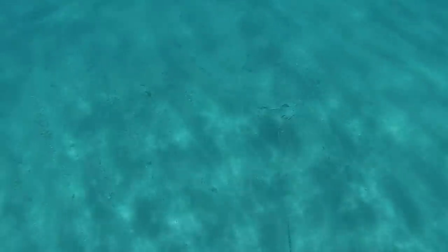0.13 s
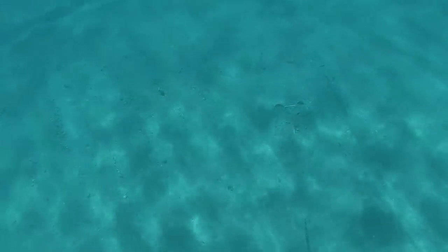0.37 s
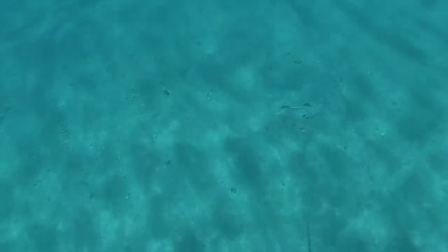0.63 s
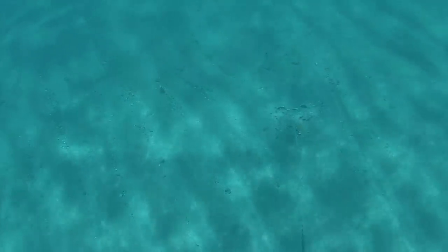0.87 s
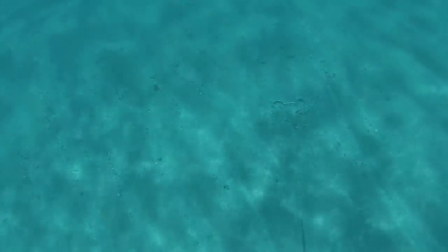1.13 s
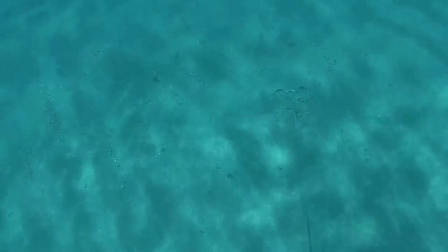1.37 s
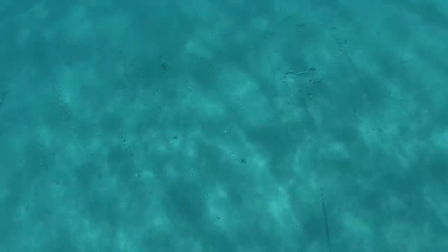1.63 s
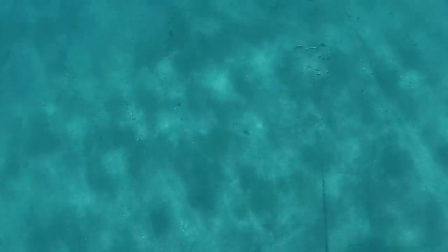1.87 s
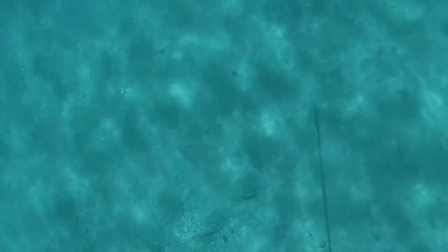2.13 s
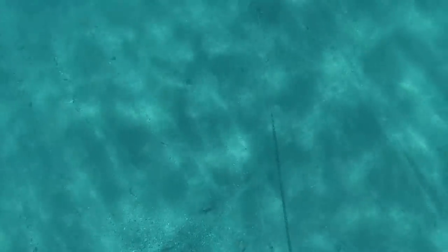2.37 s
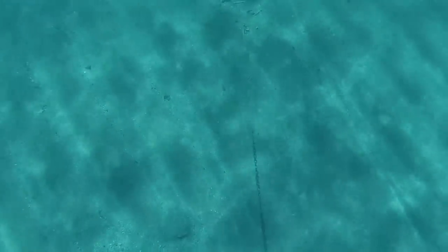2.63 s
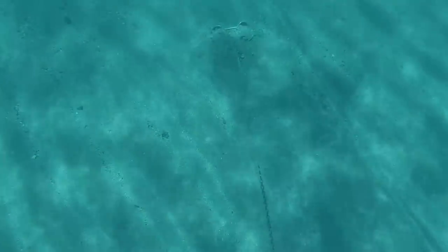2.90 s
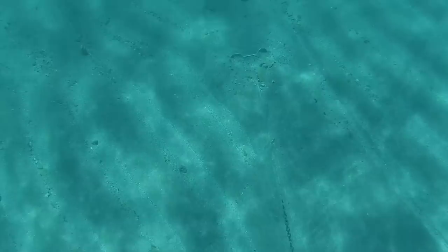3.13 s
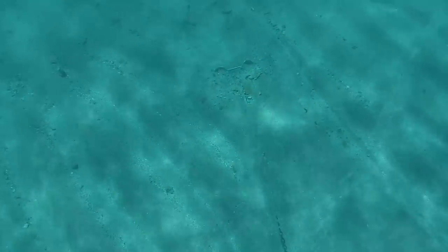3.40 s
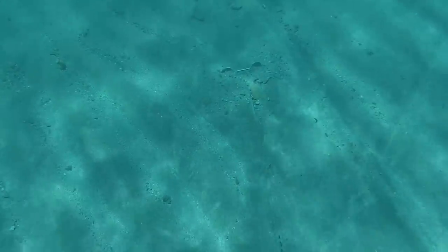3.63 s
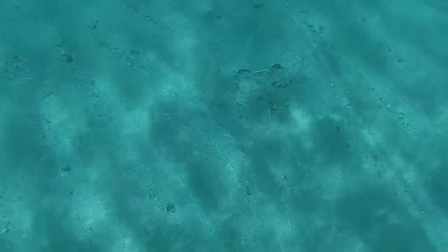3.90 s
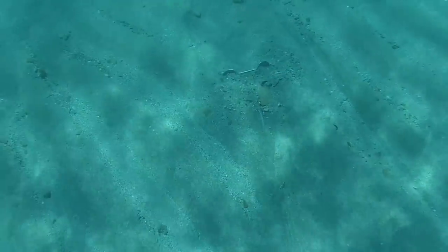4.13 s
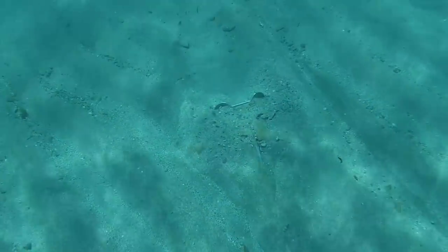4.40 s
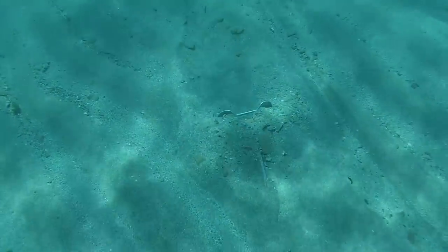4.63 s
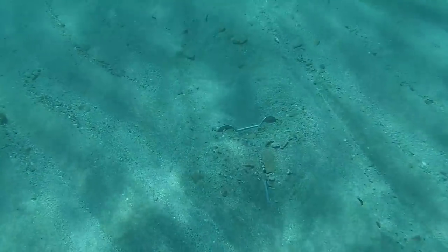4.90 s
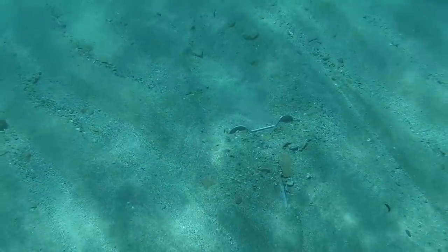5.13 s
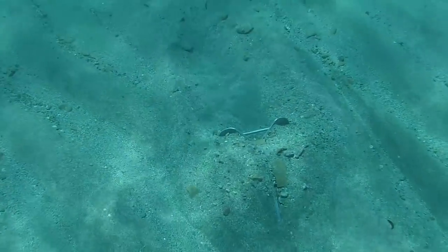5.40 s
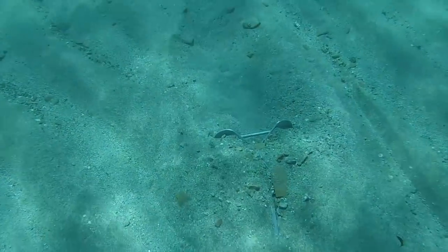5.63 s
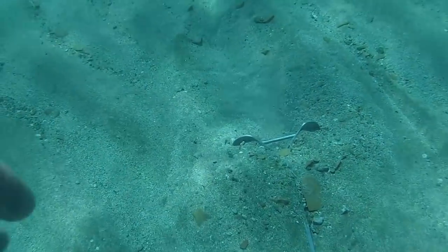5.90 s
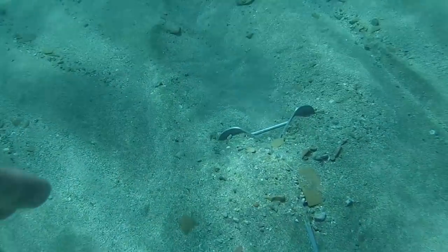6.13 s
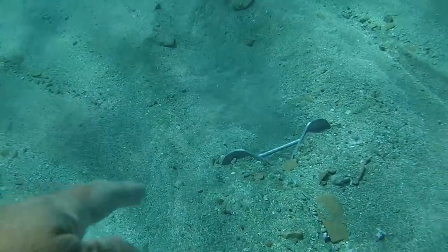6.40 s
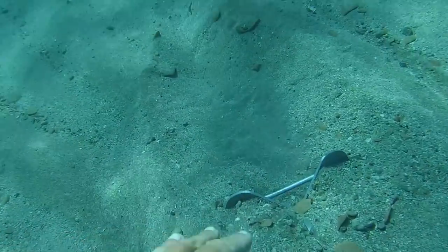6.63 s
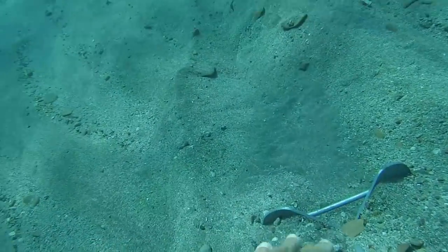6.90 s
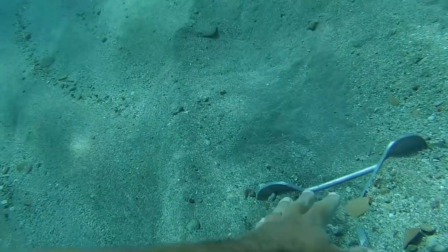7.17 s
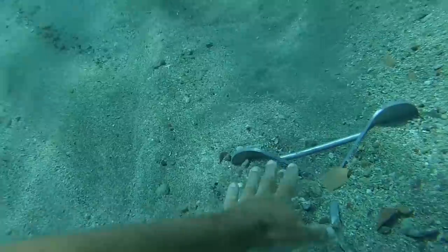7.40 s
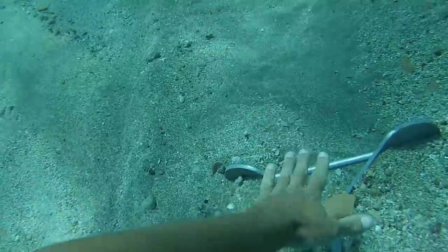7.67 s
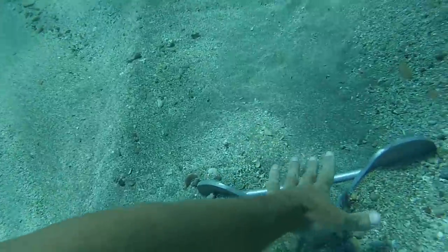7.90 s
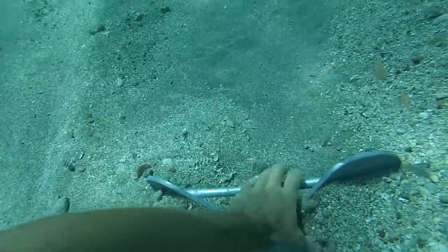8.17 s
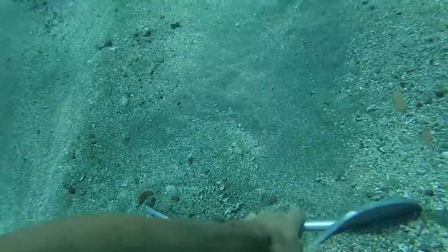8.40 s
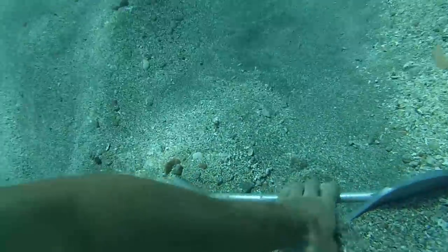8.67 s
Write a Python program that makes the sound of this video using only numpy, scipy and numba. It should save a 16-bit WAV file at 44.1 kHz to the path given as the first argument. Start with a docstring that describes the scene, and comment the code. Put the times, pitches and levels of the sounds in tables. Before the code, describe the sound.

A far boat engine throbs throughout, about 35 soft pulses a second, heard as a hollow, rough hum ringing in a sealed underwater case. Faint hiss and flurries of tiny seabed crackles lie behind. A knock with a brief watery gurgle opens, then faint ticks until a bubble at 1.3 s and a dull bump at 1.75 s. From 1.9 s bubbles gather into a splashy gurgle, capped by a heavy hollow knock at 2.4 s; the hum then strengthens. Scattered bubbles and a light tick follow. At 4.0-4.2 s a buckle gives a quick bright, gritty series of snaps, slightly louder right, amid bubbles and a pop. Low air pops come near 4.7 s, knocks and a bump around 5.2-5.3 s, and bigger bursts at 5.5 s. Afterwards it calms: hum, isolated bubbles, clearest at 7.5 s, and small taps at 6.7, 7.2 and 7.55 s until the end at 8.8 s.

```python
"""Sinking camera case

A camera in a sealed case sinks toward the seabed while a far six-cylinder boat engine throbs through the water.
Firing pulses and steady noise drive the case's resonances, which glide with depth. Behind them lie shaped hiss
with seabed crackle, rumbling eddies and gurgling air made of many ringing bubbles. Damped tones and short
pulses make the single bubbles, bursting pockets, bumps and knocks; noise cracks and a rub make a strap buckle.
"""
import sys
import numpy as np
from scipy import signal
from scipy.fft import rfft, irfft
from scipy.io import wavfile
from scipy.ndimage import uniform_filter1d
from numba import njit

SR = 44100
rng = np.random.default_rng(int(sys.argv[2]) if len(sys.argv) > 2 else 0)


def pcm_store(signal):
    """Save signal as 16-bit PCM."""
    levels = np.round(np.clip(np.atleast_2d(signal), -1, 1) * 32767)
    wavfile.write(sys.argv[1], SR, levels.astype(np.int16).T)


def voltage_ratio(level):
    """Linear amplitude factor for a level in decibels (scalar or array-like)."""
    return 10 ** (np.asarray(level, float) / 20)


N = 387328
T = np.arange(N) / SR
FIRING_HZ = 34.95

# Hiss colour, relative: f/Hz, level/dB per Hz
HISS_COLOUR = [(35, -48), (60, -17), (326, -17), (569, 2), (701, -2.5), (969, -28), (1610, -11),
               (1900, -27.5), (3240, -28), (5150, -32), (13900, -38.5), (15300, -44)]
# Water moving past: t/s, rumble level/dB, gurgle drive level/dB
WATER_FLOW = [(0.0, -47, -77), (0.07, -35, -35.5), (0.12, -45.5, -63.5), (0.98, -51.5, -62.5),
              (2.12, -45, -48), (2.4, -35, -32), (2.49, -33, -39.5), (3.4, -44.5, -52.5), (4.25, -34, -35),
              (4.33, -38, -48.5), (4.74, -44, -38.5), (4.96, -44.5, -51), (5.13, -40, -35.5),
              (5.45, -41, -51), (5.52, -41, -31.5), (5.75, -42.5, -50.5), (8.73, -44.5, -58),
              (8.78, -37, -49)]
# Single bubbles: t/s, peak level of the body before its swell and ring overlap others/dB, starting f/Hz
SINGLE_BUBBLES = [(1.275, -36, 376), (1.93, -36.5, 165.), (2.04, -28, 772), (2.083, -30, 739),
                  (2.133, -23.5, 598), (2.2, -26.5, 492), (2.284, -21, 610), (2.301, -18, 562),
                  (2.316, -18.5, 538), (2.732, -28, 590.), (2.777, -26., 593.4), (3.24, -28, 370.),
                  (3.682, -26.5, 480.), (3.73, -28., 319.2), (4.047, -19, 505), (4.194, -20.5, 529),
                  (4.227, -20.5, 567), (4.369, -24.5, 637), (5.148, -25.5, 277.6), (5.97, -28, 643.),
                  (6.978, -28.5, 698.6), (7.465, -29, 666), (7.536, -20, 684), (7.615, -31, 550),
                  (8.003, -25, 816.6), (8.463, -28, 614)]
# Air pockets that burst at the port: t/s, drive level/dB, starting f/Hz
AIR_POPS = [(4.2395, -14.5, 560.), (4.637, -27, 333.4), (4.681, -21.5, 298), (4.718, -19, 324),
            (5.517, -19., 370.), (5.5539, -20, 279), (5.5649, -13.5, 260.)]
# Dull bumps: t/s, level/dB, length/s
DULL_BUMPS = [(1.75, -29, 0.019), (2.402, -16, 0.011), (5.3145, -19, 0.0073)]
# Knocks on the case: t/s, drive level/dB, starting f/Hz, tick drive level/dB, tick f/Hz
CASE_KNOCKS = [(.0553, -13.5, 623, -34, 2690), (.573, -47, 603., -40, 3300), (.706, -40, 670, -43, 3060),
               (2.3745, -26, 962, -31.5, 2190), (2.3775, -0.5, 648, -25.5, 1584),
               (2.444, -19, 1110, -27, 2440), (3.005, -25.5, 1650, -35.5, 3040),
               (5.182, -25, 655., -33.5, 1625), (5.3035, -18, 728, -31.5, 1580),
               (6.675, -45, 650., -33.5, 3260), (7.17, -25, 775, -36, 1730.), (7.55, -41, 686, -35, 2200)]
# Buckle snaps: t/s, drive level/dB, starting f/Hz, dull part drive level/dB
BUCKLE_SNAPS = [(3.991, -26, 5230, -34), (4.0047, -11, 5230, -25), (4.0543, -7, 8860, -26.5),
                (4.0732, -8.5, 13000, -28), (4.1013, -24.5, 6530, -32), (4.127, -12, 15200, -29),
                (4.1374, -32, 9430, -41), (4.1735, -34, 4680, -32), (4.1852, -10.5, 14560, -27.5),
                (4.194, -36, 9100, -32)]
# Firings arrive early or late as the engine hunts and the diver moves: t/s, lag/ms (below 0 is early)
FIRING_LAG = [(0.0, -0.2), (1.05, -1.9), (1.75, -1.6), (2.45, -10.0), (3.5, -1.2), (4.2, -14.3),
              (4.9, -5.0), (5.6, -11.5), (6.3, -11.0), (6.65, -12.7), (7.0, -9.7), (7.7, -14.0),
              (8.05, -11.3), (8.78, -12.7)]
# Strength of the six cylinders in firing order, relative: level/dB
CYLINDER_LEVEL = [1.5, 3, -3, 0.5, 1, 1.8]
# Case resonances: f at the surface/Hz, f at the bottom/Hz, width/Hz, share of steady water noise/0-1
CASE_RESONANCES = [(590., 643, 76, 0.77), (1263, 1085, 53, 0.4), (1501, 1701, 95, 0.34),
                   (2294, 2226, 300, 0.48), (3030, 3300, 206, 0.75)]
# Sinking: t/s, depth/0 surface to 1 bottom
CASE_DEPTH = [(0, 0.063), (2.2, 0.17), (6.8, .9), (8.78, 0.84)]
# Hum in each case resonance, changing with the surface echo: t/s, five drive levels/dB
HUM_LEVELS = [(0.0, -48.5, -60., -64, -65.5, -63.5), (1.979, -46.5, -60.5, -62, -62.5, -61),
              (2.4, -38, -52.5, -53.5, -56.5, -55.5), (2.95, -36.5, -54.5, -49, -52.5, -63),
              (3.5, -41., -66, -48, -62.5, -63), (4.4, -40.5, -58, -55, -56.5, -64.5),
              (5.9, -45, -73.5, -47.5, -55.5, -64), (7.55, -42.5, -60.5, -57.5, -55., -65.5),
              (8.78, -43.5, -61, -60.5, -57.5, -69)]


def unit(x):
    """Scale to rms 1."""
    return x / np.sqrt(np.mean(x ** 2))


def curves(table):
    """Draw each column of a table as a curve, one value a sample."""
    s, *columns = np.transpose(table)
    return [np.interp(T, s, column) for column in columns]


@njit
def svf(x, hz, width):
    """State-variable band-pass with a moving centre, gain 1 there."""
    y, b, l = np.empty(len(x)), 0., 0.
    for i in range(len(x)):
        g, k = np.tan(np.pi * hz[i] / SR), width / hz[i]
        v = (b + g * (x[i] - l)) / (1 + g * (g + k))
        b, l, y[i] = 2 * v - b, l + 2 * g * v, k * v
    return y


def band(x, lo_hz, hi_hz):
    """Fixed band-pass."""
    return signal.sosfilt(signal.butter(2, [lo_hz, hi_hz], "band", fs=SR, output="sos"), x)


def walk(rate):
    """Random levels held 1 / rate s and slewed twice; spread near 1."""
    k = int(SR / rate)
    steps = np.repeat(rng.standard_normal(N // k + 1), k)
    return 1.57 * uniform_filter1d(uniform_filter1d(steps, k), k)[:N]


def add(out, s, sound):
    """Mix a sound in at s seconds."""
    i = int(max(s, 0) * SR)
    n = min(sound.shape[-1], N - i)
    out[..., i:i + n] += sound[..., :n]


def ring(hz, t60, rise, glide):
    """A damped tone, envelope peak 1, with rise time constant in s; pitch climbs by the part glide over t60 s."""
    t = np.arange(int(t60 * SR) + 9) / SR
    shape = (1 - np.exp(-t / rise)) * np.exp(-np.log(1000) * t / t60)
    return shape / shape.max() * np.sin(2 * np.pi * hz * (t + glide * t ** 2 / (2 * t60)))


def water():
    """Faint hiss with the dense crackle of small seabed animals, which comes in flurries."""
    chance = 70. * voltage_ratio(4. * walk(12)) / SR  # 70 clicks a second, swelling and thinning
    clicks = (rng.random(N) < chance) * voltage_ratio(np.minimum(2.4 * rng.exponential(size=N), 9.))
    # each click becomes a decaying puff of noise
    crackle = signal.lfilter([1], [1, -.991], clicks) * rng.standard_normal(N)
    drive = rng.standard_normal(N) * voltage_ratio(1.1 * walk(16))
    drive += 0.74 * unit(band(crackle, 1230.0, 10600.0))
    hz = np.maximum(np.fft.rfftfreq(N, 1 / SR), 1)
    f, db = np.transpose(HISS_COLOUR)
    colour = voltage_ratio(np.interp(np.log(hz), np.log(f), db))
    hiss = unit(irfft(rfft(drive) * colour, N))
    return voltage_ratio(-47) * hiss + voltage_ratio(-64.0) * unit(band(crackle, 2830.0, 4140.0))


def flow():
    """Eddies press on the membrane; a stream of bubbles leaves the case, churning and fizzing."""
    rumble_db, gurgle_db = curves(WATER_FLOW)
    eddies = signal.lfilter([1], [1, -.996], rng.standard_normal(N))
    flutter = band(eddies, 38.7, 153.0) * voltage_ratio(4.44 * walk(7.6))
    rumble = unit(band(eddies, 7.4, 52.5) + .5 * flutter)

    bubbles = np.zeros(N)
    for when, size, loud, last in rng.random((1000, 4)):
        hz = 168.3 * (777.0 / 173.0) ** size
        cycles = 3.05 + 15.4 * last
        add(bubbles, when * N / SR, voltage_ratio(-2.5 * np.log(loud + 0.01)) * ring(hz, cycles / hz, 0.0008, 0.45))
    churn = band(rng.standard_normal(N), 230.0, 860.0) * voltage_ratio(3.4 * walk(20))
    # the fizz follows the bubbles' loudness
    fizz = band(rng.standard_normal(N), 1100., 3940.0) * uniform_filter1d(np.abs(bubbles), 300)
    low_pass = signal.butter(4, 900., fs=SR, output="sos")
    stream = signal.sosfilt(low_pass, 0.96 * unit(bubbles) + 0.71 * unit(churn))
    return voltage_ratio(rumble_db) * rumble + voltage_ratio(gurgle_db) * (stream + 0.11 * unit(fizz))


def single_bubbles():
    """Each bubble rings with a climbing pitch; its neck snaps shut and stirs the case."""
    out = np.zeros(N)
    for s, db, hz in SINGLE_BUBBLES:
        add(out, s, voltage_ratio(db) * ring(hz, 0.063, 0.003, 0.11))
        add(out, s, voltage_ratio(db) * 0.5 * ring(554.0, 0.012, 0.00028, 0.42))  # neck
        add(out, s + 0.00201, voltage_ratio(db) * 0.25 * ring(744.0, 0.066, 0.0021, 0.041))  # case
    return out


def pops():
    """A bursting pocket gives one pressure pulse, its own ring and a ring near 700 Hz."""
    out = np.zeros(N)
    for s, db, hz in AIR_POPS:
        add(out, s, voltage_ratio(db) * 0.42 * np.hanning(int(0.0017 * SR)))
        add(out, s, voltage_ratio(db) * 0.41 * ring(hz, 0.065, 0.00046, 0.11))
        add(out, s, voltage_ratio(db) * .2 * ring(698.0, 0.1, 0.00077, .03))
    return out


def bumps():
    """Each bump pushes the membrane once, a single smooth negative pulse."""
    out = np.zeros(N)
    for s, db, length in DULL_BUMPS:
        add(out, s, -voltage_ratio(db) * np.hanning(int(length * SR)))
    return out


def knocks():
    """A knock rings the case low, with a tone an octave below, and ticks above in ringing noise."""
    out = np.zeros(N)
    for s, db, hz, tick_db, tick_hz in CASE_KNOCKS:
        add(out, s, -voltage_ratio(db) * 0.75 * ring(hz, 0.025, 0.0012, 0.028))
        add(out, s, voltage_ratio(db) * 0.24 * ring(.5 * hz, 0.013, 0.0013, .04))
        burst = np.exp(-np.arange(900) / SR / 0.0023) * rng.standard_normal(900)
        tick = band(burst, 0.75 * tick_hz, 1.09 * tick_hz) + 0.2 * band(burst, 1200.0, 2530.0)
        add(tick, 0, 0.24 * ring(tick_hz, .018, 0.00045, 0.033))
        add(out, s, voltage_ratio(tick_db + 8.5) * tick / np.abs(tick).max())
    return out


def snaps():
    """Bright cracks, each with its own ring and a dull part in the case, over a gritty rub; unlike in the two ports."""
    out, t = np.zeros((2, N)), np.arange(2600) / SR
    for s, db, hz, dull_db in BUCKLE_SNAPS:
        noise = rng.standard_normal((3, 2600))  # one shared, one for each port
        decay = np.exp(-t / 0.0006) + 0.088 * np.exp(-t / 0.0068)
        crack = 0.32 * (noise[0] + 0.68 * noise[1:]) * decay
        add(crack, 0, ring(hz, 0.0039, .0001, 0.0098))
        add(out, s, voltage_ratio(db) * band(crack, 950.0, 12000.0))
        add(out, s, voltage_ratio(dull_db + 7.0) * ring(2120.0, 0.0063, 0.00028, .01))
        add(out, s, voltage_ratio(dull_db) * ring(1400.0, 0.011, 0.00042, .01))
    noise = rng.standard_normal((3, N))
    rub = np.interp(T, [3.98, 4.0, 4.05, 4.09, 4.2, 4.215], [0, 0.48, 0.54, 0.52, 0.1, 0.0053])
    grit = band(noise[0] + 0.38 * noise[1:], 1100., 14500.) * voltage_ratio(4.7 * walk(120))
    return (out + voltage_ratio(-40.5) * rub * grit) * voltage_ratio(np.array([[-.7], [.7]]))  # right is louder


def engine_hum():
    """Each firing knocks and rattles the hull; the throb rings the case, steady water noise fills the gaps."""
    firings = FIRING_HZ * (T - curves(FIRING_LAG)[0] / 1000) + 0.28
    k, phase = np.floor(firings).astype(int) % 600, firings % 1
    chance = rng.standard_normal((600, 3))[k].T  # per firing: strength, timing, start of the swing
    size = voltage_ratio(np.array(CYLINDER_LEVEL)[k % 6] + 2.05 * chance[0])
    rattle = unit(size * (1 - np.exp(-phase / 0.065)) * np.exp(-phase / 0.22))
    knock = unit(size * np.exp(-((phase - .22 - .03 * chance[1]) / .17) ** 2))
    depth, out = curves(CASE_DEPTH)[0], 0
    for (top_hz, bottom_hz, width, steady), db in zip(CASE_RESONANCES, curves(HUM_LEVELS)):
        hz = top_hz + (bottom_hz - top_hz) * depth
        power = steady * voltage_ratio(3.1 * walk(13)) + (1 - steady) * rattle ** 2
        noise = rng.standard_normal(N) * np.sqrt(power)
        # a wide second pass keeps the valleys between resonances dark
        rough = unit(svf(svf(noise, hz, width), hz, 4.16 * width))
        # the knock swings the resonance cleanly for a few milliseconds, from a new start each time
        swing = np.sin(2 * np.pi * np.cumsum(hz) / SR + 9 * chance[2])
        clean = knock * voltage_ratio(3.8 * rng.standard_normal(600)[k]) * swing
        out = out + voltage_ratio(db + 1.5) * unit(rough + 1.36 * (1 - steady) * clean)
    # a weak resonance above the lowest one fades as pressure stiffens the case
    weak = unit(svf(rng.standard_normal(N), np.full(N, 835.0), 55.0))
    return out + voltage_ratio(-58.5 - 8.6 * depth) * weak


def scene():
    """Nearly the same in both ports; loud close blows lean to the right, and the snaps are wide."""
    near = single_bubbles() + pops() + bumps() + knocks()
    mid = water() + flow() + near + engine_hum()
    lean = np.tanh(5.2 * uniform_filter1d(np.abs(near), 400))  # grows with loudness
    side = voltage_ratio(-84.) * rng.standard_normal(N) - 0.1 * band(near, 120., 5000.) * lean
    return np.array([mid + side, mid - side]) + snaps()


def roll_off(x):
    """The treble ends steeply here."""
    return signal.sosfilt(signal.butter(12, 16620, fs=SR, output="sos"), x)


def record(dry):
    """Roll the top off steeply above 15.5 kHz and deliver the finished mix."""
    top_cut = signal.butter(10, 15500., fs=SR, output="sos")
    mix = signal.sosfilt(top_cut, dry)
    return roll_off(mix)


dry = scene()
out = record(dry)
pcm_store(out)
```